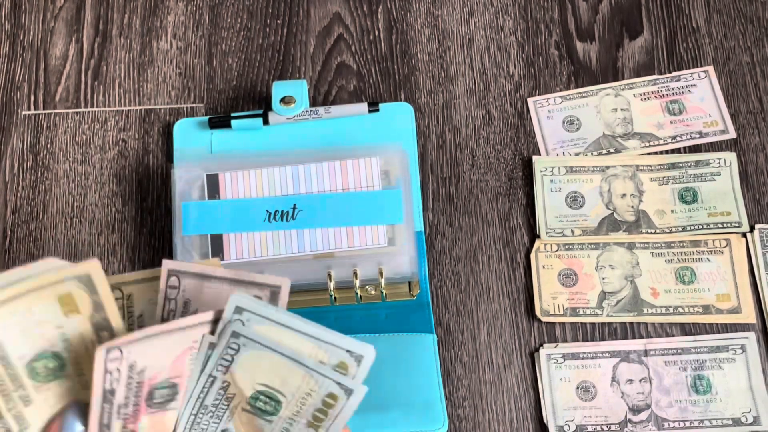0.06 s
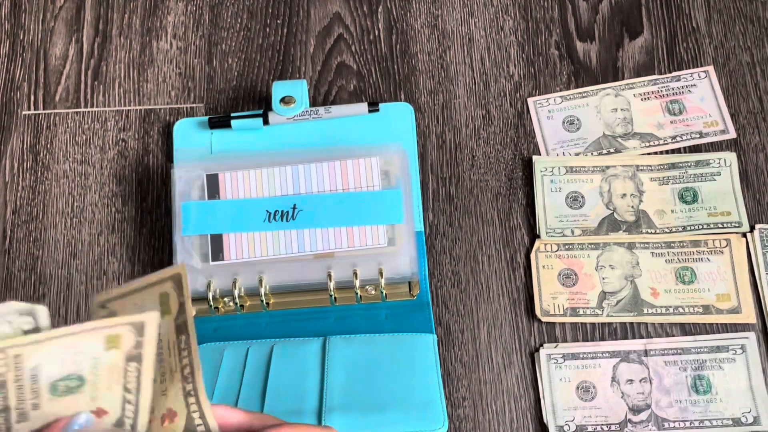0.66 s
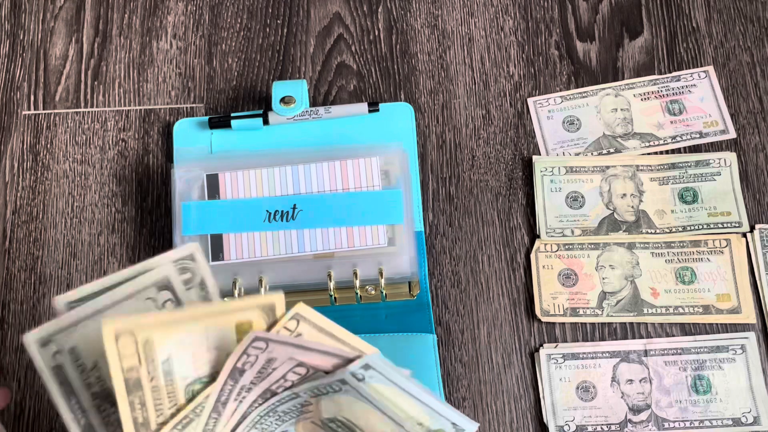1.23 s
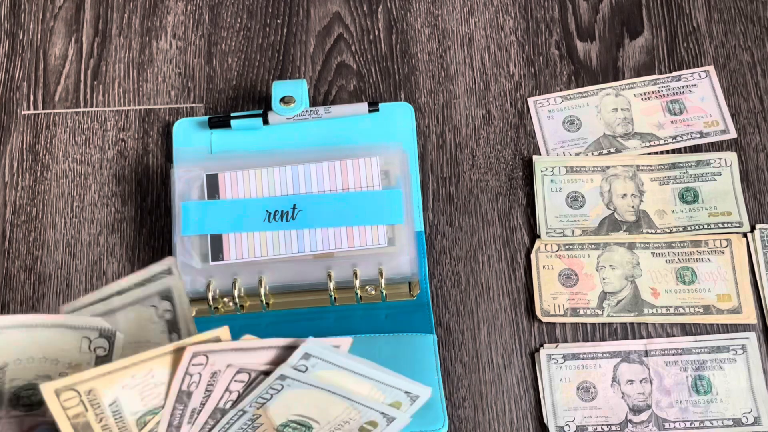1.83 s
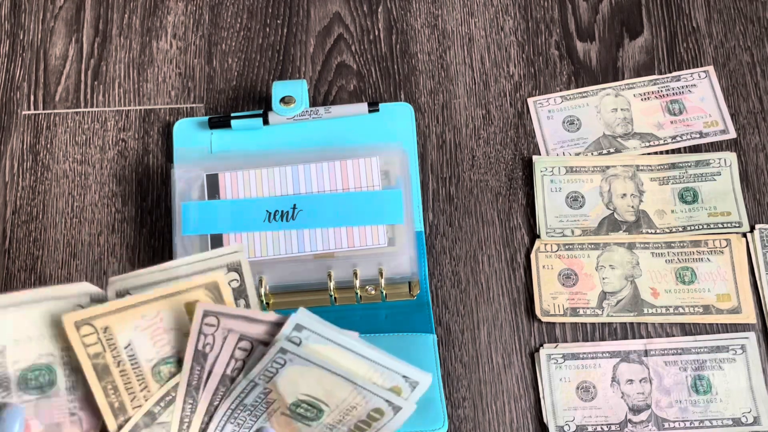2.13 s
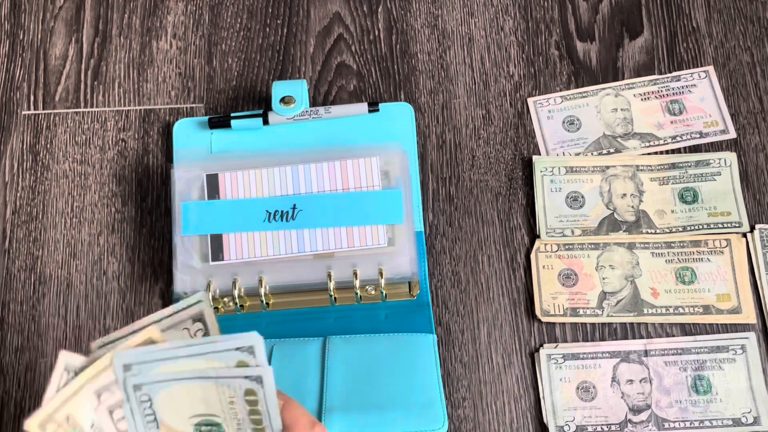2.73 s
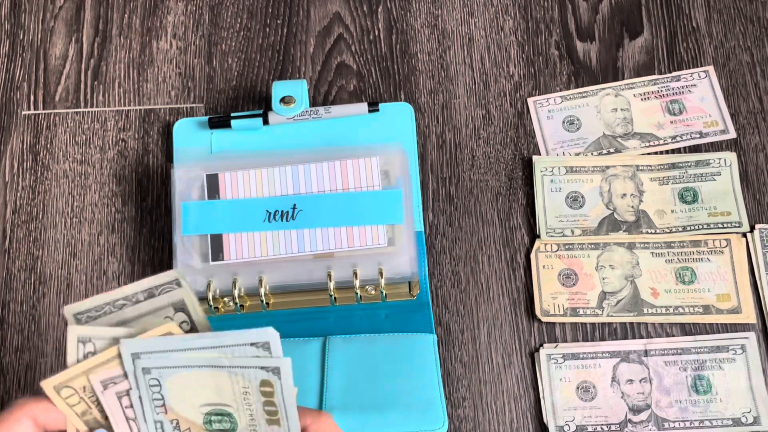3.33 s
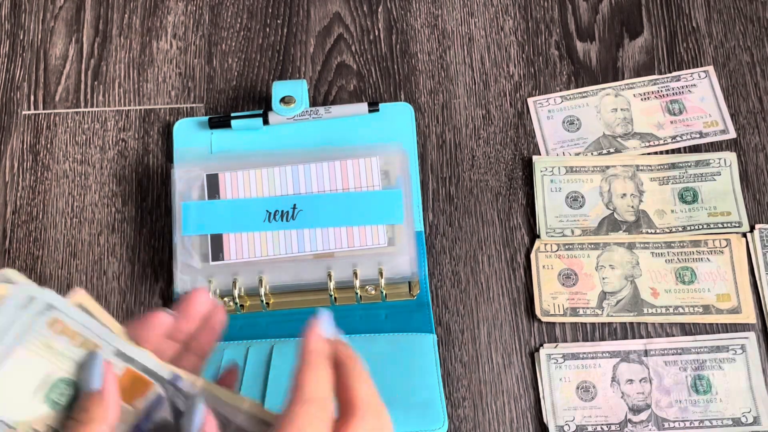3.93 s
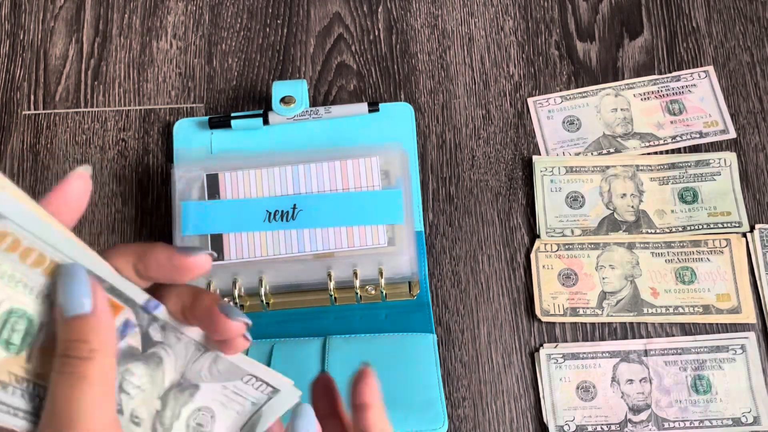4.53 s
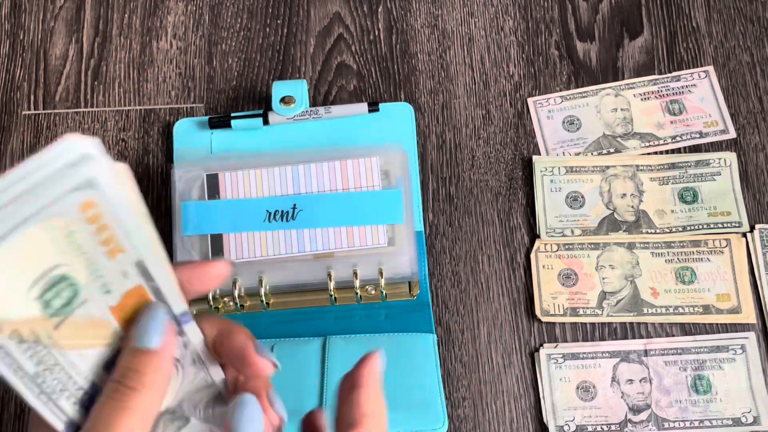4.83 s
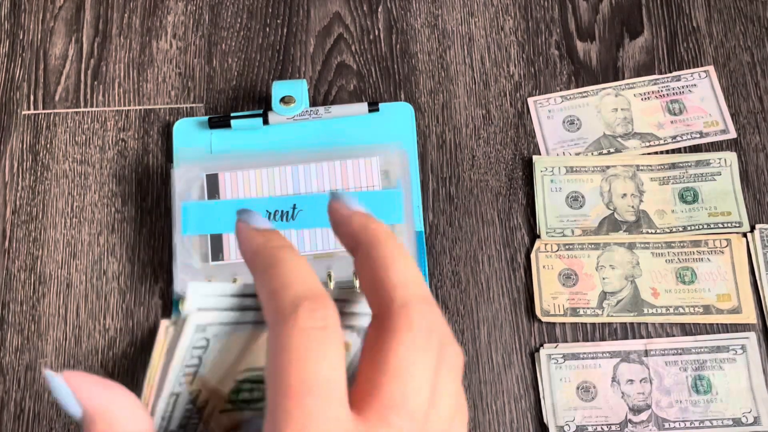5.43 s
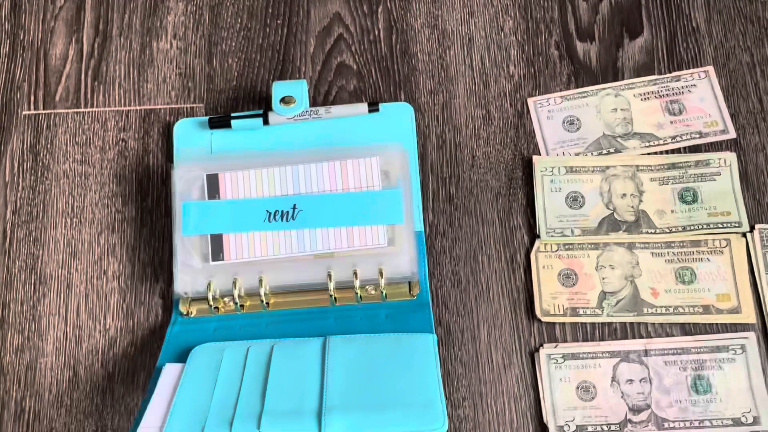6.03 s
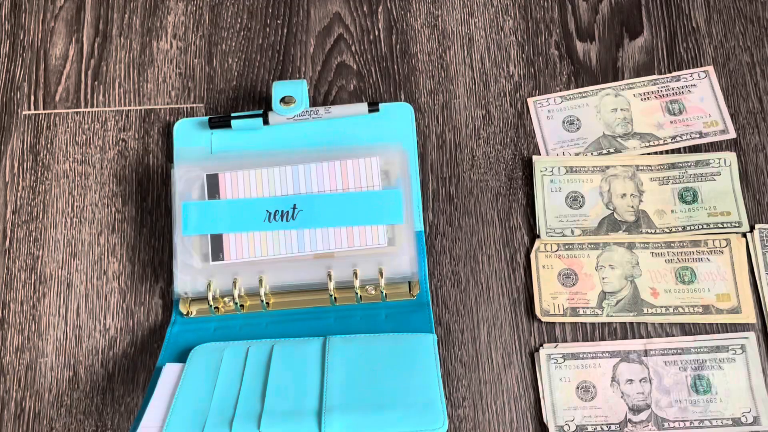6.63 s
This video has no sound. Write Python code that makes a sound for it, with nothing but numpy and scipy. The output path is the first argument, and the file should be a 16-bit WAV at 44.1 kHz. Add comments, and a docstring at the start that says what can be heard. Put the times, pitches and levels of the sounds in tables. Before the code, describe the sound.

A stack of paper banknotes is fanned out by hand, the bills hissing over each other with dull flaps and crisp snaps as corners flick free. Sorting follows in short strokes and quick swishes. Near the end the stack knocks once on a wooden surface and a few light strokes square it up. The sound is close, in a quiet room with a faint low rumble.

```python
"""A stack of banknotes is handled close above a wooden surface, over the low rumble of a quiet room.
First it is fanned out: sheets hiss over each other, buckle with dull flaps, snap as corners flick free.
Sorting follows in short strokes and quick swishes, with the sharpest snap at 5 s.
At 5.6 s the stack knocks down on its edge, and a few light strokes square it up.
Two closely spaced microphones give the stereo image."""
import sys
import numpy as np
from scipy import signal
from scipy.fft import rfft, irfft, next_fast_len
from scipy.io import wavfile

SR = 44100
rng = np.random.default_rng(int(sys.argv[2]) if len(sys.argv) > 2 else 0)


def output_pcm(signal):
    """Save a mono or channel-first signal as 16-bit PCM at the path in sys.argv[1].

    Samples are clipped to [-1, 1] before scaling.
    """
    pcm = np.clip(np.atleast_2d(signal).T, -1, 1) * 32767
    wavfile.write(sys.argv[1], SR, np.round(pcm).astype(np.int16))


N = 294607
TIME = np.arange(N) / SR

# room tone, rumble and air: f/Hz, spectral level/dB
ROOM_SPECTRUM = [(22, -18), (32, -10), (45, -7.5), (62, -2.5), (80, -4.5), (105, -16.5), (160, -25.5),
                 (300, -31), (800, -40), (2000, -53.5), (8000, -53.5), (15000, -43.5)]
# held sheets creeping between strokes, most while fanned out: t/s, hiss level/dB, flex level/dB
SHEET_CREEP = [(0, -53, -55), (0.5, -65, -70), (1.03, -57.5, -57), (1.19, -68.5, -67.5), (1.35, -64, -64),
               (1.47, -79, -81), (1.56, -59.5, -64), (2.2, -60, -59.5), (2.41, -65.5, -68.5),
               (2.52, -57.5, -59.5), (3.15, -66.5, -62), (3.58, -71, -65.5), (3.86, -71.5, -70),
               (4.22, -61, -74), (4.47, -90, -81), (4.72, -65, -72.5), (4.88, -92.5, -98.5),
               (5.4, -84, -72.5), (5.9, -73, -86.5), (6.68, -99, -82)]
# one sheet pushed over another:
# t/s (up to speed), attack/s, hold/s, hiss level/dB, tilt/(dB/octave), flex level/dB, edge ring f/Hz
SHEET_STROKES = [(0.0, .02, 0.045, -41, 0.5, -51, 2900), (0.064, 0.017, 0.028, -44, -2, -48.5, 2930),
                 (0.192, 0.012, .11, -42.5, 0.3, -54.5, 3930), (0.338, 0.085, 0.084, -54.5, -1, -64, 4940),
                 (0.655, 0.25, 0.021, -44.5, -2, -54, 3140), (0.699, .1, 0.054, -51, -1, -60, 3140),
                 (0.835, 0.042, 0.085, -45.5, -4.5, -47.5, 7400), (0.952, .05, 0.029, -53, -3.5, -54, 2540),
                 (1.283, 0.11, 0.029, -50, 0.5, -58.5, 6700), (1.402, 0.14, 0.026, -55, -2.5, -67, 4700),
                 (1.521, .06, 0.018, -54, -3.5, -79, 4700), (1.829, 0.13, 0.027, -48, -1.5, -48.5, 4900),
                 (1.86, .04, 0.06, -52, -0.5, -65, 4860), (2.163, 0.11, 0.046, -57, -2.5, -54.5, 3070),
                 (2.295, 0.098, 0.054, -56, -0.5, -56, 2810), (2.568, 0.055, 0.059, -56, -4, -54, 2520),
                 (2.756, 0.18, 0.1, -53, -2.5, -55, 5160), (2.85, 0.1, 0.081, -49, -6, -51, 4220),
                 (3.028, 0.097, .07, -49, -1.5, -52, 2940), (3.162, 0.11, 0.035, -49.5, -3, -52, 2090),
                 (3.344, 0.1, 0.048, -47.5, -.8, -67, 3070), (3.386, 0.056, 0.051, -58, -2.5, -75, 3070),
                 (3.476, 0.076, 0.032, -45, -1.5, -47.5, 2080),
                 (3.662, 0.019, 0.0092, -38.5, -.5, -54, 2850), (3.759, 0.13, 0.01, -45, 0, -54, 3420),
                 (3.939, 0.12, 0.11, -55, -1.2, -65.5, 3120), (4.102, 0.07, 0.048, -54.5, -2, -62.5, 3070),
                 (4.305, 0.062, 0.02, -41.5, -1.4, -51.5, 3100),
                 (4.353, .05, 0.036, -54.5, -1, -56.5, 3100),
                 (4.524, 0.016, 0.029, -48.5, 0.9, -62.5, 3070),
                 (4.57, 0.047, 0.032, -44.5, -0.2, -62, 3070), (4.67, 0.044, 0.0064, -55, -0.5, -65, 3440),
                 (4.992, 0.048, 0.035, -46.5, -1, -54.5, 7960), (5.069, .05, 0.054, -55.5, -0.5, -79, 1970),
                 (5.165, .1, 0.015, -51, -1.3, -64.5, 1970), (5.223, 0.06, .035, -58, 0, -66, 1970),
                 (5.297, 0.079, 0.017, -53.5, -2, -62.5, 1610), (5.34, 0.057, 0.095, -71.5, -5, -72, 1600),
                 (5.485, 0.029, 0.029, -54.5, 0.5, -70, 3240),
                 (5.542, 0.02, 0.033, -48.5, -0.5, -60.5, 3240),
                 (5.608, 0.014, 0.0047, -41.5, -1, -51.5, 6430), (5.662, 0.015, 0.025, -63, -1, -65, 3000),
                 (5.712, .08, 0.042, -60.5, 0.5, -85, 4500), (5.821, .04, 0.017, -61, 4.5, -89, 4500),
                 (5.916, 0.081, 0.027, -64, 6.5, -69, 4500), (6.003, 0.0038, 0.01, -39, 4, -54.5, 4570),
                 (6.035, .02, 0.027, -57.5, -2.5, -62, 4570), (6.113, .03, 0.0097, -58.5, 0, -67.5, 3000),
                 (6.197, 0.05, 0.012, -63, 5.5, -94, 3000), (6.266, .008, 0.05, -55.5, 2.5, -79, 2810),
                 (6.322, 0.032, 0.004, -49, 0, -57, 2810), (6.411, 0.031, .01, -54.5, -2.5, -64, 1850),
                 (6.436, 0.034, 0.0089, -52, .5, -59.5, 1850), (6.577, 0.067, 0.11, -65.5, 1.5, -78, 3000)]
# the hiss of paper on paper: f/Hz, spectral level/dB
HISS_SPECTRUM = [(700, -16), (1500, -5), (2300, -1), (3200, -0.5), (4500, -1.5), (6000, -0.5), (7800, 1.5),
                 (9100, -2.5), (10300, 0), (11500, -4), (13000, -3.5), (14300, -1.5), (15800, -11.5)]
# the body of a bending sheet and the air under it: f/Hz, spectral level/dB
FLEX_SPECTRUM = [(70, -5.5), (130, 4), (190, -1.5), (280, 3), (400, -0.5), (640, -3), (850, -2), (1060, 2),
                 (1400, -6.5), (1800, -7), (2800, -21.5)]
# corners flicking free:
# t/s, crack level/dB, tilt/(dB/octave), crack ring f/Hz, flap level/dB, flap ring f/Hz
CORNER_SNAPS = [(0.0544, -36.5, -1, 3300, -42, 1160), (0.1344, -42, -13.5, 5100, -52.5, 1580),
                (0.1885, -28.5, 5.5, 3300, -48.5, 910), (0.323, -70, -1, 2980, -48.5, 610),
                (0.8083, -46.5, 0.5, 2240, -48.5, 1110), (0.8298, -44, 0, 2400, -41, 1070),
                (0.85, -41, 2, 2400, -43.5, 280), (0.8726, -29.5, 0.5, 6530, -38, 880),
                (0.8872, -39.5, -3.5, 2270, -43.5, 1000), (0.934, -48.5, -9, 6690, -51, 1130),
                (0.9533, -51, -7, 2510, -45.5, 1050), (0.9747, -56, -4, 2430, -50, 760),
                (1.037, -47.5, -5, 1480, -49, 600), (1.125, -52, -4, 4800, -71, 810),
                (1.1797, -66, -7, 3020, -51, 283), (1.3044, -41, -6, 6800, -44, 467),
                (1.6219, -48.5, 0.5, 2960, -53, 354), (1.7003, -38.5, -9, 8150, -45, 1000),
                (1.7377, -71, -6, 1600, -53.5, 1270), (1.805, -49, -13, 2040, -58, 220),
                (1.8267, -34, 0.3, 5050, -47, 414), (1.9545, -42.5, -8.5, 3420, -48, 1160),
                (2.0201, -54, -7, 5310, -53.5, 390), (2.0795, -53.5, -1, 2980, -56, 220),
                (2.143, -53.5, -9, 4940, -52, 220), (2.2413, -43.5, -1, 4440, -50.5, 1050),
                (2.2458, -54, -4.5, 1870, -44, 1020), (2.3333, -53.5, -6.5, 4570, -43.5, 555),
                (2.3652, -70, 1, 1600, -47.5, 1030), (2.452, -48, -9, 2980, -45.5, 282),
                (2.6474, -58, -18, 2110, -44, 442), (2.804, -63, 3, 1990, -46, 273),
                (2.851, -54, -9, 4100, -45.5, 1160), (2.8607, -48, -2, 3730, -41.5, 287),
                (3.1272, -73, -9, 2110, -48.5, 436), (3.248, -59.5, -7, 1850, -58, 445.5),
                (3.301, -89, -6, 3000, -52, 376), (3.4648, -40.5, -11.5, 2110, -56, 1580),
                (3.4868, -39.5, 6.5, 2580, -51, 352), (3.7098, -45, -3, 2880, -57.5, 270),
                (3.78, -48, 7, 3000, -45.5, 1010), (3.9115, -55.5, 4, 2540, -65, 320),
                (4.312, -34, 0, 3220, -47, 800), (4.5075, -49.5, -1, 8240, -71, 222),
                (4.7984, -63.5, -4.5, 1630, -72.5, 1580), (4.9903, -24, 0.5, 8400, -65, 1590),
                (5.0038, -39.5, -4.5, 8000, -57, 1580), (5.0374, -36.5, -4.5, 8450, -64, 1580),
                (5.1193, -51.5, 7, 2510, -79, 1580), (5.3039, -48, 7.5, 6860, -56.5, 684),
                (5.5011, -53, -9.5, 4470, -59.5, 1600), (5.549, -41.5, 4.5, 3390, -63, 1580),
                (5.6268, -32, 0.5, 5900, -42, 223), (6.1071, -53.5, 2.5, 3000, -73, 220),
                (6.3223, -51.5, -6.5, 2810, -64, 1580)]
# a sheet sliding free: t/s (at the peak), half-width/s, level/dB, centre f/Hz
SHEET_SWISHES = [(0.298, 0.039, -50.5, 5040), (0.583, 0.023, -49, 5530), (0.639, 0.021, -39.5, 3000),
                 (2.587, 0.019, -51.5, 2520), (3.048, 0.011, -47, 2830), (3.103, 0.0069, -47, 2760),
                 (3.16, 0.0088, -50.5, 2290), (3.486, 0.019, -48, 2120), (3.767, 0.011, -43, 3750),
                 (4.303, .012, -54, 3200), (4.334, 0.0039, -46, 1790), (5.62, 0.012, -43, 4420)]
# the stack set down on its edge: t/s, level/dB
STACK_KNOCKS = [(5.6266, -39.5)]
# modes of the struck wood: f/Hz, relative level/dB, t60/s
WOOD_MODES = [(75, -3, 0.27), (191, -12, 0.098), (300, 3.5, 0.033), (540, -2, 0.047), (701, 2, 0.049),
              (1144, -2, 0.054)]
# stereo width by frequency, narrow near 9 kHz and at the very top: f/Hz, level/dB of side over mid
STEREO_WIDTH = [(60, -21.5), (200, -10.5), (450, -14.5), (750, -6), (1200, -10.5), (2000, -21), (4000, -14),
                (7000, -6), (8900, -25), (11000, -5.5), (13500, -34)]
# stereo balance: f/Hz, level/dB of left over right
MIC_BALANCE = [(60, 0.5), (250, 2.5), (550, 1.5), (1000, 5), (1500, 2), (3500, 1), (5700, 0.6),
               (8000, -0.8), (15000, 0)]
# the direct path reaching the two microphones: f/Hz, phase lead of the left/rad
MIC_PHASE_LEAD = [(20, 0), (300, .15), (750, .5), (1700, 0), (3300, .5), (5250, .4), (5750, -1.3),
                  (6800, -.7), (7200, -1.2), (7600, -2.2), (8200, -2.4), (8850, -3.1), (11000, -4.6),
                  (12800, -6.2)]


def from_db(db):
    """Decibels to gain."""
    return np.exp(np.asarray(db) * (np.log(10) / 20))


def rms_one(x):
    """Scale to rms 1."""
    return x / np.sqrt(np.mean(x ** 2) + 1e-20)


def in_time(rows):
    """The columns of a curve table at every sample."""
    s, *columns = np.transpose(rows)
    return [np.interp(TIME, s, c) for c in columns]


def at_hz(points, hz):
    """Read a table on a log-frequency axis."""
    f, value = np.transpose(points)
    return np.interp(np.log(hz + 1), np.log(f + 1), value)


def colour(x, spectrum, tilt_db=0):
    """Minimum-phase EQ in this shape, rolled off beyond its ends and tilted per octave above 1.5 kHz."""
    size = 2 * next_fast_len(x.shape[-1] // 2 + 1024)
    hz = np.fft.rfftfreq(size, 1 / SR) + 1
    octaves_outside = np.abs(np.log2(hz / np.clip(hz, spectrum[0][0], spectrum[-1][0])))
    db = at_hz(spectrum, hz) - 12 * np.minimum(octaves_outside, 4)
    db += tilt_db * np.log2(np.maximum(hz, 1500))
    cepstrum = irfft(np.log(from_db(db)))[:size // 2]
    cepstrum[0] = 0  # shape only, no overall gain
    response = np.exp(rfft(2 * cepstrum, size))
    return irfft(rfft(x, size) * response, size)[..., :x.shape[-1]]


def band_pass(pair, hz, q):
    """Two-pole band-pass with gain 1 on top; a moving centre is followed block by block."""
    hz = np.clip(np.atleast_1d(hz), 50, .45 * SR)
    size = 256 if len(hz) > 1 else pair.shape[1]
    out, state = np.zeros(pair.shape), np.zeros((2, 2))
    for i in range(0, pair.shape[1], size):
        r, w = np.exp(-np.pi * hz[i] / q / SR), 2 * np.pi * hz[i] / SR
        gain = (1 - r * r) / 2
        poles = [1, -(1 + r * r) * np.cos(w), r * r]
        out[:, i:i + size], state = signal.lfilter([gain, 0, -gain], poles, pair[:, i:i + size], zi=state)
    return out


def resonate(pair, hz, boost_db, q):
    """Bell boost on a pair of signals."""
    return pair + (from_db(boost_db) - 1) * band_pass(pair, hz, q)


def drift(rate):
    """Smooth random modulation that changes about rate times a second; rms about 1."""
    r = np.exp(-16 * np.pi * rate / SR)
    slow = signal.lfilter([1], [1, -2 * r, r * r], rng.standard_normal(N // 8 + 4002))[4000:]
    return np.interp(np.arange(N) / 8, np.arange(len(slow)), rms_one(slow))


def grains(per_s, spread_db, t60):
    """Envelope of random slips of uneven size, each starting at once and dying away; rms 1."""
    sizes = from_db(spread_db * np.minimum(rng.exponential(1, N), 3.5))
    power = (rng.random(N) < per_s / SR) * sizes ** 2
    decay = from_db(-120 / (t60 * SR))
    return rms_one(np.sqrt(signal.lfilter([1], [1, -decay], power + 1e-12)))


def roughened(slips, share):
    """Two unrelated noises (mid, side) with a share of their power in the slips."""
    return rng.standard_normal((2, N)) * np.sqrt(1 - share + share * slips ** 2)


def burst(envelope, spectrum, tilt_db, ring_hz, ring_db, q):
    """A short noise burst with one resonance; rms 1 over its first 9 ms."""
    noise = rng.choice([-1, 1], (2, len(envelope))) * envelope
    sound = resonate(colour(noise, spectrum, tilt_db), ring_hz, ring_db, q)
    return sound / np.sqrt(np.mean(sound[:, :round(.009 * SR)] ** 2, axis=1, keepdims=True))


def room_tone(rumble_db, waver_db, air_db, hum_hz, hum_db):
    """The bed: a wavering low rumble with a hum in it, under a trace of steady air."""
    level_db = rumble_db - waver_db * drift(6.4)
    noise = rms_one(colour(rng.standard_normal((2, N)), ROOM_SPECTRUM))
    rumble = signal.sosfilt(signal.butter(1, 120, fs=SR, output="sos"), noise)
    air = noise - rumble
    phase = 2 * np.pi * hum_hz * TIME
    hum = rms_one(drift(2.9) * np.cos(phase) + drift(3.4) * np.sin(phase))
    rumble[0] += from_db(hum_db) * hum
    return from_db(level_db) * rumble + from_db(air_db) * air


def handling(creep_tilt_db, creep_edge_hz, swell_db, release_s):
    """Hand strokes ride on the creep, the loudest leading the tone: hiss dB, tilt, flex dB, edge Hz."""
    hiss_power, flex_power = from_db(in_time(SHEET_CREEP)) ** 2
    tilt_sum, edge_sum = hiss_power * creep_tilt_db, hiss_power * creep_edge_hz
    for s, attack, hold, hiss_db, tilt_db, flex_db, edge_hz in SHEET_STROKES:
        # attack and release each span swell_db
        away = np.maximum((s - TIME) / attack, (TIME - s - hold) / release_s)
        push = from_db(-swell_db * np.clip(away, 0, 10)) ** 2
        stroke_power = push * from_db(hiss_db) ** 2
        hiss_power += stroke_power
        flex_power += push * from_db(flex_db) ** 2
        tilt_sum += stroke_power * tilt_db
        edge_sum += stroke_power * edge_hz
    tilt_db, edge_hz = tilt_sum / hiss_power, edge_sum / hiss_power
    return 10 * np.log10(hiss_power), tilt_db, 10 * np.log10(flex_power), edge_hz


def friction(hiss_db, tilt_db, edge_hz):
    """Fibres catch and slip; a faster, lighter stroke is brighter, and the free edge rings along."""
    slips = grains(per_s=800, spread_db=1.5, t60=0.0039)
    hiss = colour(roughened(slips, share=0.19), HISS_SPECTRUM)
    edge_db = 3.5 + 4 * np.log2(3000 / edge_hz)  # a longer edge rings lower and stronger
    hiss = rms_one(resonate(hiss, edge_hz, edge_db, q=9.2))
    size = next_fast_len(N, real=True)
    spectrum, log_hz = rfft(hiss, size), np.log(np.fft.rfftfreq(size, 1 / SR) + 1)
    centres_hz = np.geomspace(1500, 14000, 6)
    out, tilted_power, plain_power = 0, 0, 0
    for centre, weights in zip(centres_hz, np.eye(len(centres_hz))):
        band = irfft(spectrum * np.interp(log_hz, np.log(centres_hz), weights), size)[:, :N]
        gain = from_db(tilt_db * np.log2(centre / centres_hz[0]))
        power = np.mean(band ** 2)
        tilted_power += power * gain ** 2
        plain_power += power
        # the contact patch keeps changing, and the colour with it
        out += band * gain * from_db(2.5 * drift(42))
    makeup_gain = np.sqrt(plain_power / tilted_power)
    pressure_db = 1.8 * drift(30)
    return out * makeup_gain * from_db(hiss_db + pressure_db - 2.94)


def flexing(flex_db):
    """Bent sheets give way in small dull flaps, whose pitch wanders as the bend changes."""
    flaps = grains(per_s=120, spread_db=3.5, t60=0.034)
    bend_hz = 750 * 2 ** (0.46 * drift(12))
    body = colour(roughened(flaps, share=0.6), FLEX_SPECTRUM)
    return from_db(flex_db - 1.95) * rms_one(resonate(body, bend_hz, boost_db=3.5, q=6.5))


def snaps(crack_trim_db, flap_trim_db, echo_db, echo_t60, tip_t60, tip_tilt_db):
    """A corner springs free: a bright tick, the crack of the edge, a duller flap, near reflections."""
    out, t = np.zeros((2, N + SR)), TIME[:SR // 14]
    echoes = from_db(echo_db - 60 * t / echo_t60)
    tip = from_db(-60 * t / tip_t60)
    for s, crack_db, tilt_db, crack_hz, flap_db, flap_hz in CORNER_SNAPS:
        # a taut corner (all crack) stops sooner than a slack one (all flap)
        length_s = 0.018 * 2 ** ((flap_db - crack_db) / 15.5)
        edge_t60 = 0.91 * length_s
        flap_t60 = edge_t60 / 2 + 0.026
        release = np.hypot(from_db(-60 * t / edge_t60), echoes)
        swing = np.hypot(from_db(-60 * t / flap_t60), echoes)
        tick = burst(tip, HISS_SPECTRUM, tilt_db + tip_tilt_db, crack_hz, ring_db=19, q=1.9)
        edge = burst(release, HISS_SPECTRUM, tilt_db - tip_tilt_db, crack_hz, ring_db=12.5, q=8.3)
        flap = burst(swing, FLEX_SPECTRUM, 0, flap_hz, ring_db=10.5, q=5.4)
        tick_share = 1 / (1 + length_s / 0.0034)  # the shorter the snap, the more tick
        crack = np.sqrt(tick_share) * tick + np.sqrt(1 - tick_share) * edge
        snap = from_db(crack_db + crack_trim_db) * crack + from_db(flap_db + flap_trim_db) * flap
        start = round(s * SR)
        out[:, start:start + len(t)] += snap
    return out[:, :N]


def swishes(q):
    """A sheet speeds up and slows again; its short free length focuses the hiss into one broad peak."""
    out, t = np.zeros((2, N)), TIME[:SR // 8] - 1 / 16
    for s, half_width, level_db, hz in SHEET_SWISHES:
        hiss = rms_one(band_pass(rng.standard_normal((2, len(t))), hz, q))
        start = round((s + t[0]) * SR)
        out[:, start:start + len(t)] += from_db(level_db) * hiss * np.exp(-2 * (t / half_width) ** 2)
    return out


def stack_knock():
    """The stack's edge lands and the wood thuds in its low modes, in the mid channel only."""
    thud = np.zeros(N)
    for s, level_db in STACK_KNOCKS:
        t = np.maximum(TIME - s, 0)
        for hz, mode_db, t60 in WOOD_MODES:
            thud += from_db(level_db + mode_db - 60 * t / t60) * np.sin(2 * np.pi * hz * t)
    return np.array([thud, np.zeros(N)])


def surface_echo(pair, delay_s, sway, echo_db):
    """The wood below returns the sound a moment later; the delay sways as the hands move."""
    late = TIME - delay_s * np.exp(sway * drift(0.71))
    echo = np.array([np.interp(late, TIME, x) for x in pair])
    gain = from_db(echo_db)
    return (pair + gain * echo) / np.hypot(1, gain)


def room_tail(pair, t60, predelay_s):
    """The short diffuse reverb of a furnished room."""
    t = TIME[:SR // 2]
    response = rng.standard_normal((2, len(t))) * from_db(-60 * t / t60) * (t > predelay_s)
    response /= np.sqrt(np.sum(response ** 2, axis=1, keepdims=True))
    return signal.fftconvolve(pair, response, axes=1)[:, :N]


def microphones(pair):
    """Mid and side become left and right, set apart in phase and level."""
    size = next_fast_len(N + SR // 10)
    hz = np.fft.rfftfreq(size, 1 / SR)
    mid, side = rfft(pair, size)
    width = from_db(at_hz(STEREO_WIDTH, hz))
    lean = from_db(at_hz(MIC_BALANCE, hz))
    left = (mid + width * side) * lean
    right = (mid - width * side) * np.exp(-1j * at_hz(MIC_PHASE_LEAD, hz))
    added_gain = np.sqrt((1 + width ** 2) * (1 + lean ** 2) / 2)
    return irfft(np.array([left, right]) / added_gain, size)[:, :N]


def scene():
    """The mix: close paper and its reflections over the room tone."""
    hiss_db, tilt_db, flex_db, edge_hz = handling(
        creep_tilt_db=-1.5, creep_edge_hz=3300, swell_db=23.5, release_s=0.047)
    flicks = snaps(crack_trim_db=-1.13, flap_trim_db=-0.5, echo_db=-9.5, echo_t60=0.039,
                   tip_t60=0.0032, tip_tilt_db=0.75)
    sliding = friction(hiss_db, tilt_db, edge_hz) + swishes(q=2.3)
    sliding = surface_echo(sliding, delay_s=0.001629, sway=0.316, echo_db=-11)
    paper = sliding + flexing(flex_db) + flicks + stack_knock()
    reverb = from_db(-13.5) * room_tail(paper, t60=0.11, predelay_s=0.006)
    bed = room_tone(rumble_db=-58.5, waver_db=2, air_db=-61.5, hum_hz=65.3, hum_db=-4)
    return microphones(paper + reverb + bed)


def record(dry):
    """A steep high cut at 16 kHz."""
    return signal.sosfilt(signal.ellip(12, .1, 70, 16000, fs=SR, output="sos"), dry)


dry = scene()
out = record(dry)
output_pcm(out)
```